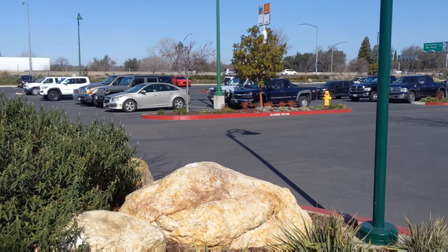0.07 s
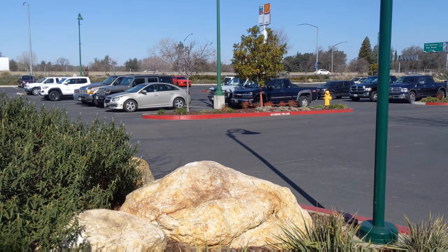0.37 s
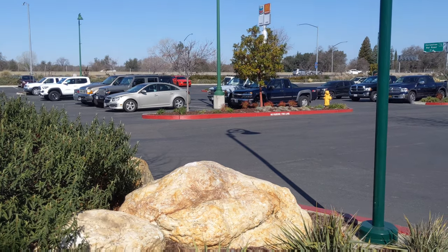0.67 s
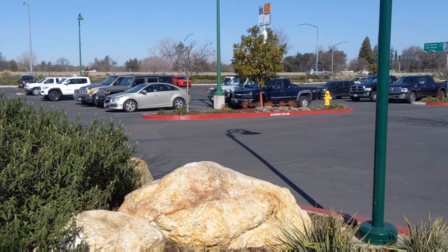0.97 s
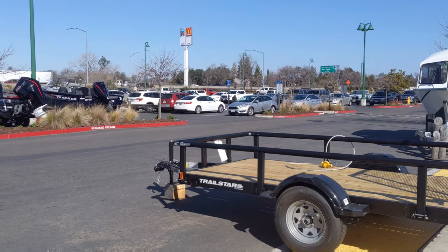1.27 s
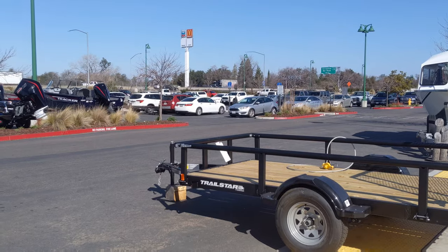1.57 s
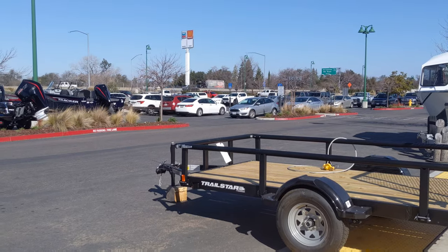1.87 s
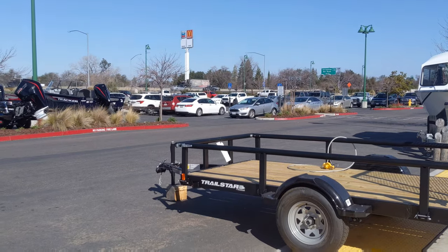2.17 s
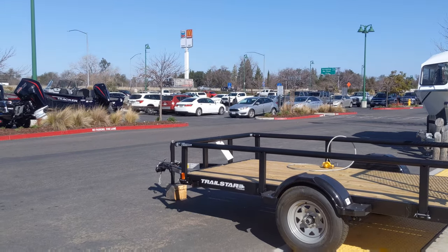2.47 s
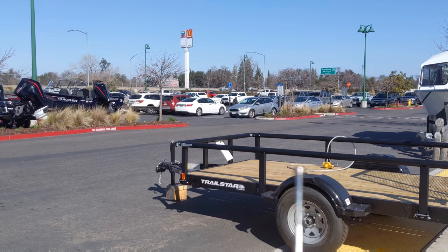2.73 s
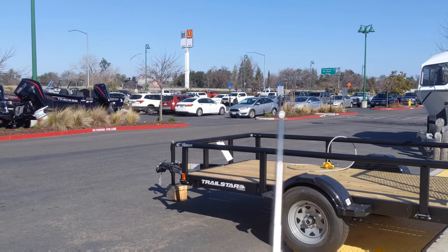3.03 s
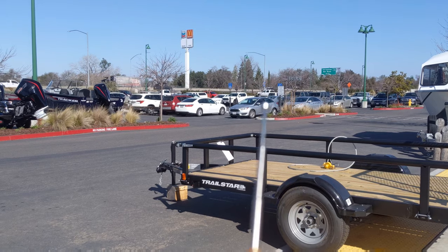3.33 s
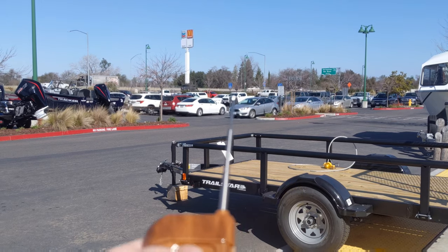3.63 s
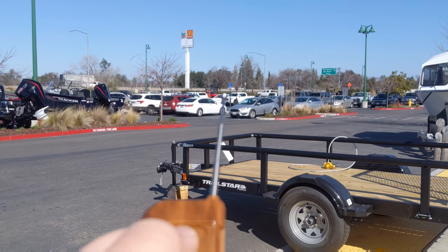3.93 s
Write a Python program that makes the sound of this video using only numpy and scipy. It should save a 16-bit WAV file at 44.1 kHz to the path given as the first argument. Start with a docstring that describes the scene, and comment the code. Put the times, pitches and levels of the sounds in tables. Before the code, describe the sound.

A steady low rumble of far-off traffic, mixed with light wind and engine hum, fills an outdoor parking area. Faint handling ticks on the microphone and distant squeaks precede a short silence, after which the traffic carries on.

```python
"""An open parking lot beside a highway, heard in two stretches with a short silence between them.
Distant traffic and light wind make a broadband rumble and roar. An idling engine sounds multiples
of its firing rate, and the hums of other vehicles come and go. Handling adds faint impulsive
ticks and a rustle; a soft knock rings in damped modes, and stick-slip friction gives thin, far
squeaks. A fine hiss rises in the second stretch."""
import sys
import numpy as np
from scipy import signal
from scipy.fft import rfft, irfft
from scipy.io import wavfile
from scipy.ndimage import uniform_filter1d

SR = 44100
rng = np.random.default_rng(int(sys.argv[2]) if len(sys.argv) > 2 else 0)


def digitize_waveform(pressure):
    """Quantize a signal to 16-bit integers and store it at the path in sys.argv[1].

    Rows of a 2-D input are taken as channels; values are limited to [-1, 1].
    """
    field = np.atleast_2d(pressure).T
    bounded = np.clip(field, -1, 1)
    quanta = np.round(bounded * 32767).astype(np.int16)
    wavfile.write(sys.argv[1], SR, quanta)


N = 176400
TIME = np.arange(N) / SR
FIRST_END_S, SECOND_START_S = 0.8685, 1.109

# Spectral density of the traffic in each stretch: frequency_hz, relative_db
TRAFFIC_SPECTRUM_1 = [(6, -33.5), (15, -5.5), (48, 1.5), (86, -2), (118, -1), (132, -2), (149, -9.5),
                      (193, -7), (266, -15), (310, -15), (366, -21), (448, -21), (518, -26), (756, -23.5),
                      (1280, -35), (1710, -32), (1970, -38.5), (2280, -34.5), (3420, -45.5), (7500, -56),
                      (15500, -65)]
TRAFFIC_SPECTRUM_2 = [(6, -26), (15, 0.5), (50, -0.5), (100, -5.5), (140, -4), (175, -7.5), (200, -10.5),
                      (235, -12.5), (285, -16.5), (335, -21.5), (370, -22.5), (436, -25.5), (489, -24.5),
                      (654, -24), (825, -27), (982, -33), (1200, -38), (1560, -33), (1920, -41),
                      (2280, -38), (4200, -48.5), (4850, -54.5), (5770, -51.5), (6490, -56.5), (9500, -60),
                      (13000, -67), (15500, -66.5)]
# Interaural level difference of the traffic in each stretch: frequency_hz, left_minus_right_db
TRAFFIC_BALANCE_1 = [(60, -1), (100, 5.5), (180, 0), (310, 4.5), (550, 9.5), (950, 2.5), (1650, -2.5),
                     (2860, -6), (4970, 1.5), (8640, 1.5), (15000, -2.5)]
TRAFFIC_BALANCE_2 = [(60, .9), (160, 2.2), (270, 3.5), (450, 5.5), (740, 3.5), (1220, 1.5), (2010, -5),
                     (3330, -.5), (5500, 3), (9080, -.3), (15000, 0)]
# Interaural coherence of the traffic: frequency_hz, coherence_ratio
TRAFFIC_COHERENCE = [(30, 0.98), (130, 0.92), (300, 0.73), (700, .7), (1200, 0.18), (2200, .15),
                     (4000, .05), (8000, 0.067), (14000, .3)]
# Swell of the traffic in the second stretch: time_s, rumble_gain_db, roar_gain_db
TRAFFIC_SWELL = [(1.1, -3, 0), (1.4, -0.5, 0.5), (1.8, 0, -0.3), (2.25, -3, -0.3), (2.7, 0.5, -1),
                 (3.1, -1, -0.3), (3.5, -1.5, 0), (3.75, -0.5, 0), (4, -2.5, -0.3)]
# Partials of the idling engine in each stretch: firing_rate_multiple, level_db
IDLE_ORDERS_1 = [(1, -43.5), (1.5, -48), (4.5, -50), (5.5, -56)]
IDLE_ORDERS_2 = [(1, -49.5), (2, -53), (3, -50.5), (4, -50.5), (5, -53), (6, -61), (7, -63), (8, -67),
                 (10, -68)]
# Gain on those partials in the second stretch: time_s, gain_db
IDLE_GAIN = [(1.1, -3), (1.6, 0), (2.7, 0), (3.3, -4), (4, -5)]
# Hums of other vehicles in each stretch: start_s, end_s, fade_s, pitch_hz, level_db
HUMS_1 = [(-.3, 1.2, .2, 120, -40.3), (0, 1.2, .25, 96, -46.5), (-.3, .36, .15, 332, -51),
          (-.3, .45, .15, 299, -56), (.42, .7, .12, 326, -53)]
HUMS_2 = [(.3, 2.9, .8, 136.5, -42.5), (1.6, 4.6, .6, 120, -50.5), (2, 5.6, 1.5, 151.5, -43.5),
          (3.5, 4.2, .12, 255, -52), (3.2, 4.2, .25, 425, -63.5)]
# Resonances of the knocked body: frequency_hz, relative_db
KNOCK_RESONANCES = [(780, 0), (1130, -3), (1450, 4), (1620, -2), (1900, -3)]
# Handling impulses: start_s, relative_db, pitch_hz, pan_db, snap_to_ring_ratio
TICK_EVENTS = [(.0635, -58, 8800, 4, 1.2), (.1195, -57, 8200, 2, .6), (.231, -49.5, 15000, 3, 1.2),
               (.236, -49, 9500, 5, 2.5), (.240, -60, 13000, 3, 1.5), (2.784, -53, 4800, -1.5, .7),
               (2.987, -54, 10000, -2, 1)]
# Friction notes: start_s, length_s, pitch_hz, level_db, octave_relative_db, scrape_relative_db
SQUEAK_EVENTS = [(.028, .075, 1605, -59.5, -25, -20), (.163, .07, 1680, -59.5, -25, -7),
                 (.53, .11, 1750, -66, -30, -20), (.66, .11, 1745, -65, -30, -25),
                 (.81, .1, 1735, -64.5, -30, -25), (.52, .06, 3245, -72, -20, -20),
                 (.63, .06, 3240, -72, -20, -20), (.783, .06, 3270, -71, -25, -20),
                 (.782, .055, 6600, -69.5, -30, -8), (3.739, .085, 3960, -69.5, -25, 4.5)]
# Spectral densities of the rustle and the hiss: frequency_hz, relative_db
RUSTLE_SPECTRUM = [(2000, 11.5), (4800, 12.5), (7000, 3.5), (9000, -7), (11800, 7.5), (13500, -6),
                   (15500, -11)]
HISS_SPECTRUM = [(2500, -26), (5500, -1), (6700, -5.5), (9500, -1), (10600, -7), (11800, -0.5),
                 (12900, -11.5), (15000, -10.5)]
# Their envelopes: time_s, relative_db
RUSTLE_ENVELOPE = [(0, -83), (.12, -83), (.19, -71), (.29, -79), (.34, -66.5), (.45, -65.5), (.5, -62),
                   (.515, -63), (.55, -78), (.9, -100)]
HISS_ENVELOPE = [(0, -101), (2.1, -84), (2.22, -76), (2.5, -73), (2.85, -76), (3.3, -77.5), (3.6, -76),
                 (4, -80)]


def traffic(spectrum, balance, swell=None, patch_db=.84, flutter_db=.5, left_lead_s=.00006):
    """Incoherent sources sum to rumble and tyre roar; long waves reach both ears nearly alike."""
    frame, hop = 2048, 512
    hz, t = np.fft.rfftfreq(frame, 1 / SR), np.arange(N // hop + 5) * hop / SR
    left_re, left_im, diffuse_re, diffuse_im, patches = rng.standard_normal((5, len(t), len(hz)))
    # The level drifts in patches of time and frequency, and flutters as a whole.
    patches = uniform_filter1d(patches, size=9, axis=0)
    patches = unit(uniform_filter1d(patches, size=14, axis=1))
    flutter = unit(uniform_filter1d(rng.standard_normal(len(t)), size=7))[:, None]
    field_db = over_hz(spectrum, hz) + patch_db * patches + flutter_db * flutter
    if swell:
        rumble_db, roar_db = over_time(swell, t[:, None])
        bass_share = 1 / (1 + (hz / 140) ** 4)  # rumble gives way to roar at 140 Hz
        field_db = field_db + bass_share * rumble_db + (1 - bass_share) * roar_db
    coherence = over_hz(TRAFFIC_COHERENCE, hz)
    left = left_re + 1j * left_im
    right = coherence * left + np.sqrt(1 - coherence ** 2) * (diffuse_re + 1j * diffuse_im)
    right *= np.exp(-2j * np.pi * hz * left_lead_s)
    gain = amp(field_db) * pan(over_hz(balance, hz))[:, None] / np.sqrt(1 + coherence)
    spectra = (np.array([left, right]) * gain).swapaxes(1, 2)
    _, sound = signal.istft(spectra, nperseg=frame, noverlap=frame - hop)
    return unit(sound[:, :N])


def idling_engine(orders, firing_hz=43.6):
    """Periodic firing gives a line spectrum whose orders all follow one slightly unsteady rate."""
    wander = .3 * drift(rate_hz=2.9)
    return sum(exhaust_tone(order * firing_hz, db, order * wander) for order, db in orders)


def vehicle_hums(hums):
    """Exhaust tones of single vehicles superpose, each swelling out of the traffic and sinking back."""
    out = np.zeros((2, N))
    for start, end, fade, hz, db in hums:
        envelope = np.clip(np.minimum(TIME - start, end - TIME) / fade, 0, 1)
        out += exhaust_tone(hz, db, drift(rate_hz=6)) * envelope
    return out


def exhaust_tone(hz, db, wander, hz_per_wander=1.2, waver_db=2.1):
    """An exhaust tone wavers on its way through the air: frequency and amplitude modulation."""
    cycles = np.cumsum(hz + hz_per_wander * wander) / SR
    waver = amp(waver_db * drift(rate_hz=7.8))
    tone = np.sin(2 * np.pi * (cycles + rng.random()))
    return pan(db=1.4) * amp(db) * unit(waver * tone)


def knock(start_s=.5125, level_db=-46, rise_s=.0005, decay_s=.0055):
    """A soft impact excites quickly damped normal modes, with a short scuff of contact noise."""
    out, t = np.zeros((2, N)), TIME[:2048]
    body = unit(sum(amp(db) * np.sin(2 * np.pi * hz * t) for hz, db in KNOCK_RESONANCES))
    scuff = amp(-4) * resonant_noise(hz=1400, width_hz=1400, size=len(t))
    envelope = np.minimum(t / rise_s, 1) * np.exp(-t / decay_s)
    add(out, start_s, pan(db=1) * amp(level_db) * unit(body + scuff) * envelope)
    return out


def handling_ticks(gain_db=-1, decay_s=.0024, snap_corner_hz=4000):
    """A brief impulse has a broad spectrum: each tick is a bright snap with a heavily damped ring."""
    out, t = np.zeros((2, N)), TIME[:1024]
    for start, db, hz, pan_db, snap_ratio in TICK_EVENTS:
        snap = noise(lambda f: f ** 2 / (f ** 2 + snap_corner_hz ** 2), len(t))
        ring = resonant_noise(hz, width_hz=1200, size=len(t))
        tick = unit(ring + snap_ratio * snap) * np.exp(-t / decay_s)
        add(out, start, pan(pan_db) * amp(db + gain_db) * tick)
    return out


def squeaks(rise_s=.008, fall_s=.05, jitter=.006, flutter_db=2):
    """Stick-slip oscillation, as of brakes or springs, gives a thin tone, its octave and a scrape."""
    out = np.zeros((2, N))
    ear_phase_cycles = np.array([[0], [.15]])
    for start, length, hz, db, octave_db, scrape_db in SQUEAK_EVENTS:
        n = int(length * SR)
        t = TIME[:n]
        pitch_hz = hz * (1 + jitter * drift(rate_hz=110)[:n])
        phase = 2 * np.pi * (np.cumsum(pitch_hz) / SR + ear_phase_cycles)
        tone = unit(np.sin(phase)) + amp(octave_db) * unit(np.sin(2 * phase))
        flutter = unit(amp(flutter_db * drift(rate_hz=16)[:n]))
        scrape = amp(scrape_db) * resonant_noise(hz, width_hz=2400, size=n)
        envelope = np.minimum(t / rise_s, 1) * np.minimum((length - t) / fall_s, 1)
        add(out, start, amp(db) * (tone * flutter + scrape) * envelope)
    return out


def treble_noise(spectrum, envelope, crossfeed, grain_db):
    """Random amplitude modulation gives noise above 1500 Hz the grain of a rustle or a fine hiss."""
    band = noise(lambda f: amp(over_hz(spectrum, f)) * (f > 1500), N)
    grain = amp(grain_db * drift(rate_hz=78))
    return unit((band + crossfeed * band[::-1]) * grain) * amp(over_time(envelope, TIME)[0])


def noise(gain, size, channels=2):
    """Linear filtering gives white noise the spectral shape gain(hz)."""
    white = rfft(rng.standard_normal((channels, size)))
    return unit(irfft(white * gain(np.fft.rfftfreq(size, 1 / SR)), size))


def resonant_noise(hz, width_hz, size):
    """A resonance selects the noise near its natural frequency."""
    return noise(lambda f: 1 / (1 + (2 * (f - hz) / width_hz) ** 2), size)


def drift(rate_hz):
    """Low-pass filtering turns noise into smooth random motion."""
    return noise(lambda f: np.exp(-(f / rate_hz) ** 2), N, channels=1)[0]


def amp(db):
    """Decibels to amplitude ratio."""
    return 10 ** (np.asarray(db) / 20)


def unit(x):
    """Normalisation to rms 1."""
    return x / np.sqrt(np.mean(x ** 2) + 1e-20)


def over_hz(points, hz):
    """Interpolation on a log-frequency axis."""
    f, value = np.transpose(points)
    return np.interp(np.log(hz + 1), np.log(f + 1), value)


def over_time(rows, t):
    """Linear interpolation of each column at times t."""
    times, *columns = np.transpose(rows)
    return [np.interp(t, times, column) for column in columns]


def pan(db):
    """Left and right gains for an interaural level difference."""
    return np.array([amp(db / 2), amp(-db / 2)]).reshape(2, -1)


def add(mix, start_s, sound):
    """Superposition of a stereo sound on the mix."""
    part = mix[:, max(round(start_s * SR), 0):][:, :sound.shape[1]]
    part += sound[:, :part.shape[1]]


def scene():
    """Pressures add: each stretch has its own traffic, engine and hums, with the small sounds on top."""
    first = amp(-37) * traffic(TRAFFIC_SPECTRUM_1, TRAFFIC_BALANCE_1)
    first += idling_engine(IDLE_ORDERS_1) + vehicle_hums(HUMS_1)
    second = amp(-37.5) * traffic(TRAFFIC_SPECTRUM_2, TRAFFIC_BALANCE_2, TRAFFIC_SWELL)
    second += idling_engine(IDLE_ORDERS_2) * amp(over_time(IDLE_GAIN, TIME)[0])
    second += vehicle_hums(HUMS_2)
    vehicles = np.where(TIME < SECOND_START_S, first, second)
    rustle = amp(-2) * treble_noise(RUSTLE_SPECTRUM, RUSTLE_ENVELOPE, crossfeed=.45, grain_db=3.5)
    hiss = treble_noise(HISS_SPECTRUM, HISS_ENVELOPE, crossfeed=.38, grain_db=1.5)
    return vehicles + rustle + hiss + handling_ticks() + knock() + squeaks()


def record(dry):
    """A gate silences the gap between the stretches; a low-pass filter limits the band to 15.7 kHz."""
    gate = (TIME < FIRST_END_S) | (TIME >= SECOND_START_S)
    low_pass = signal.firwin(511, 15700, window=("kaiser", 9), fs=SR)
    return signal.oaconvolve(dry * gate, low_pass[None], "same")


dry = scene()
out = record(dry)
digitize_waveform(out)
```